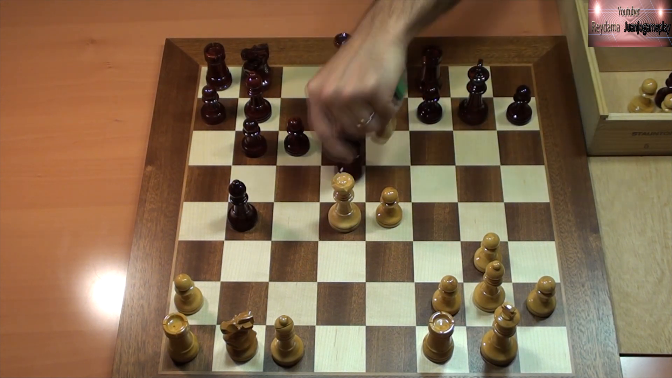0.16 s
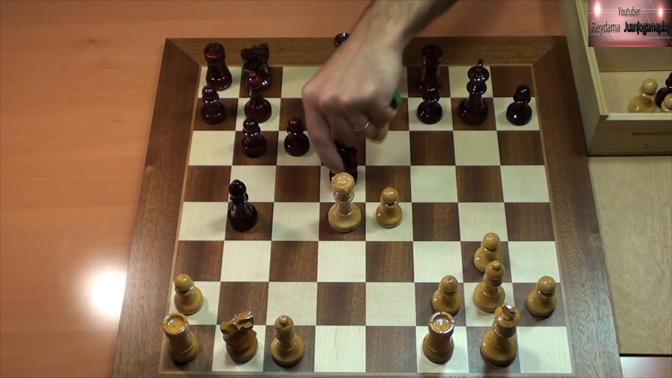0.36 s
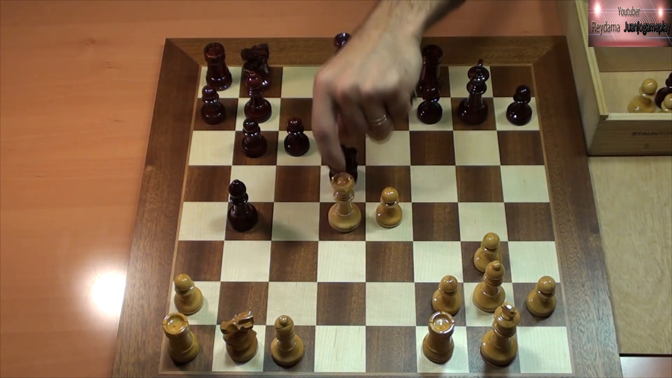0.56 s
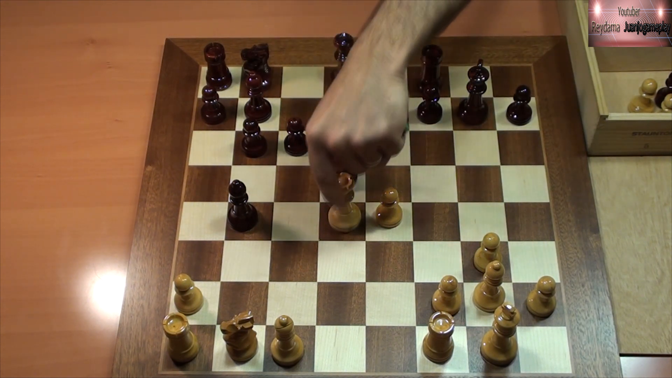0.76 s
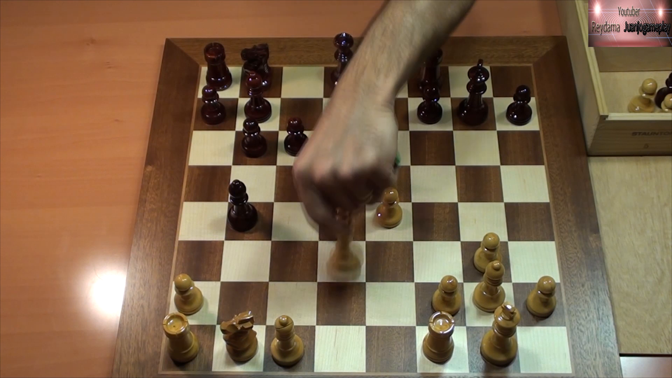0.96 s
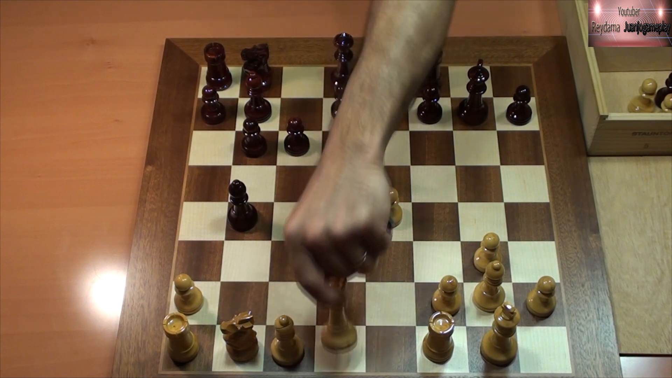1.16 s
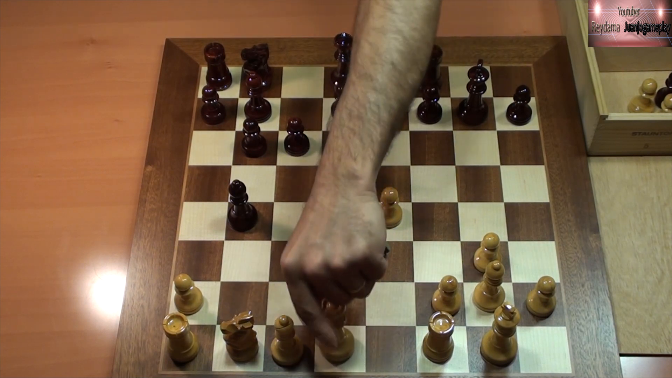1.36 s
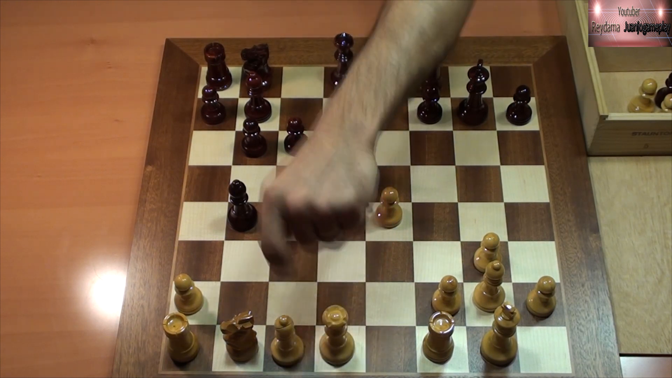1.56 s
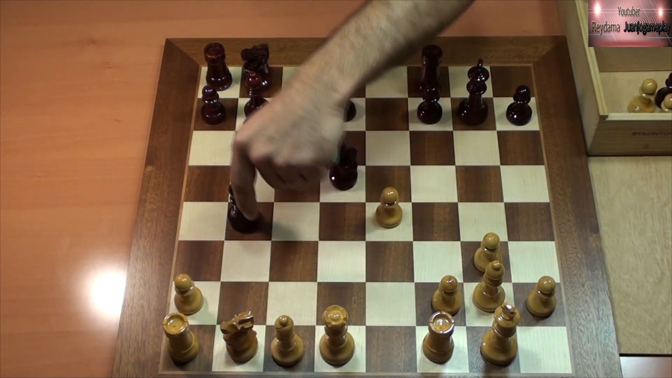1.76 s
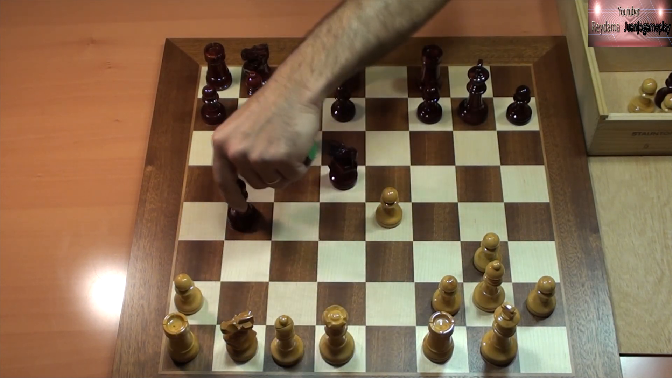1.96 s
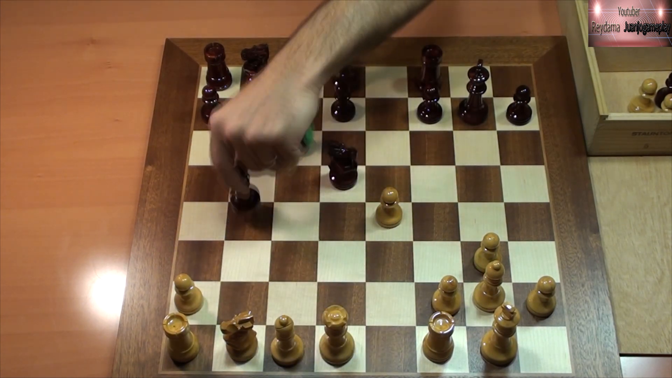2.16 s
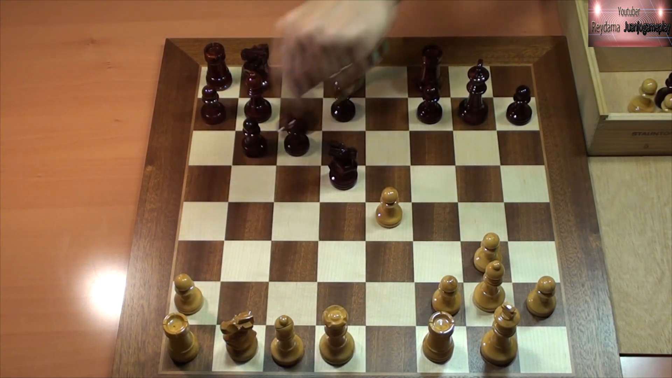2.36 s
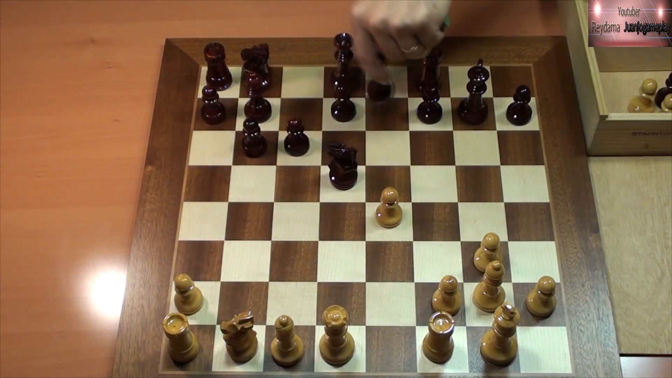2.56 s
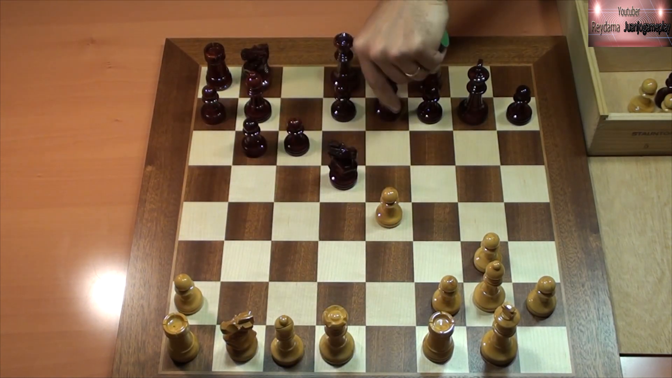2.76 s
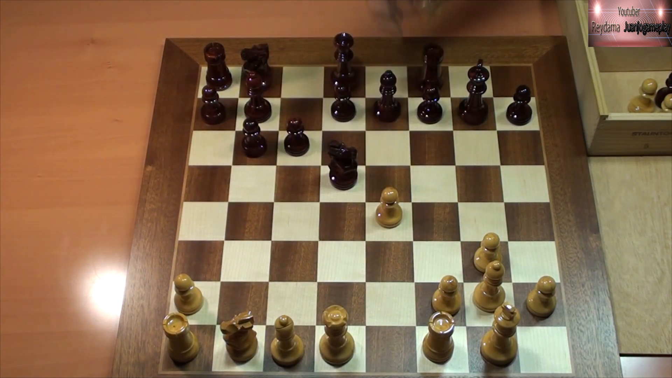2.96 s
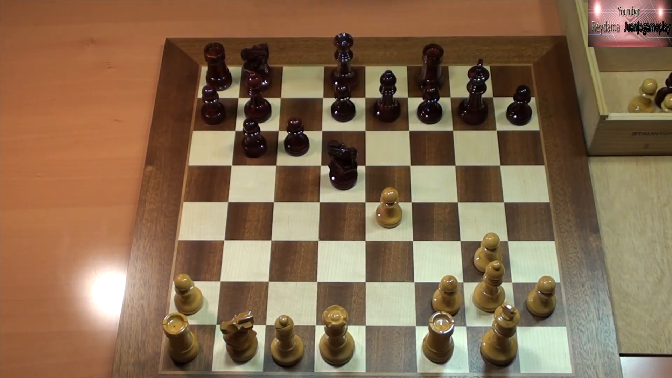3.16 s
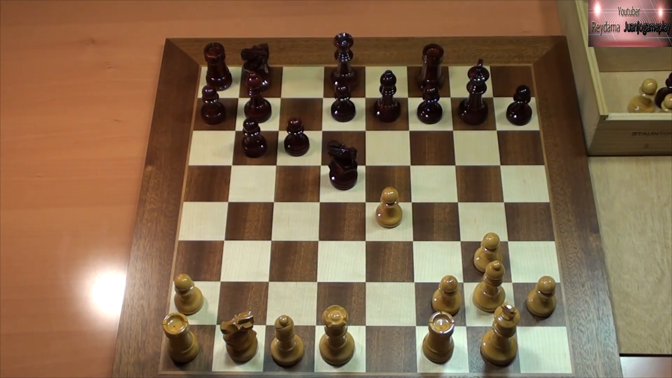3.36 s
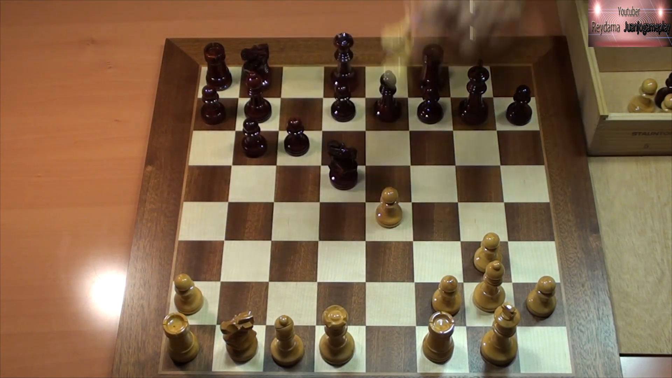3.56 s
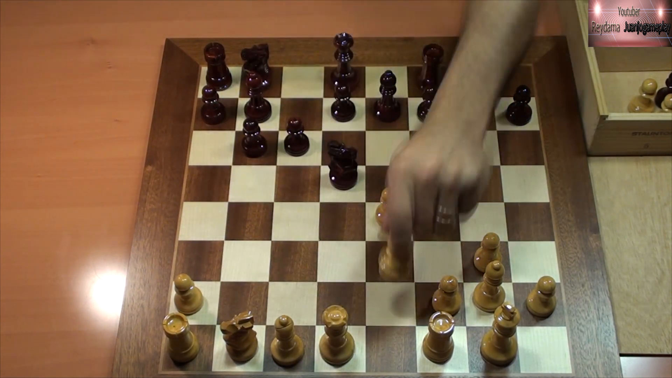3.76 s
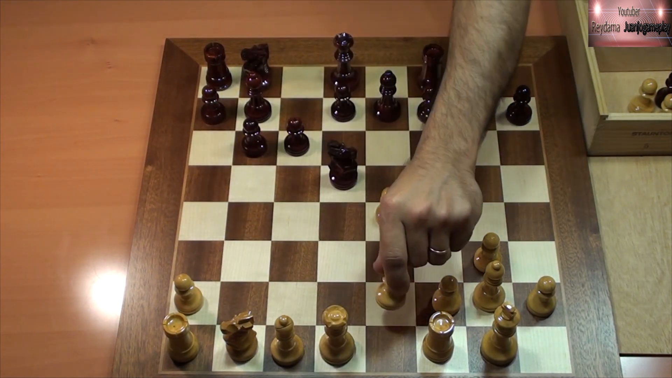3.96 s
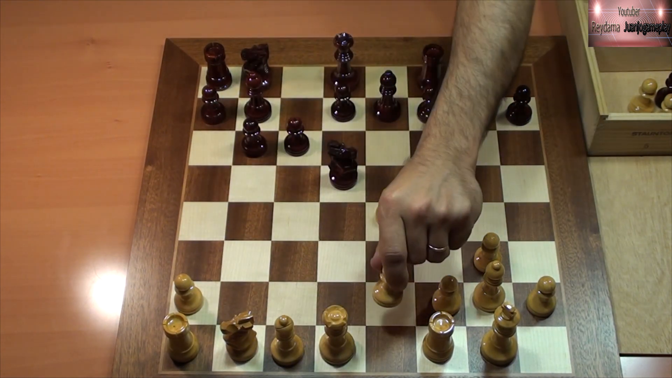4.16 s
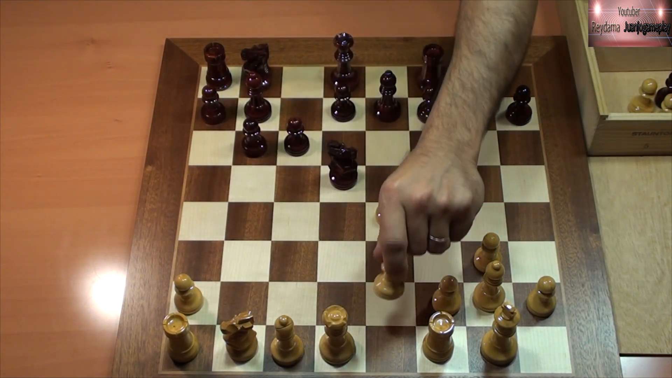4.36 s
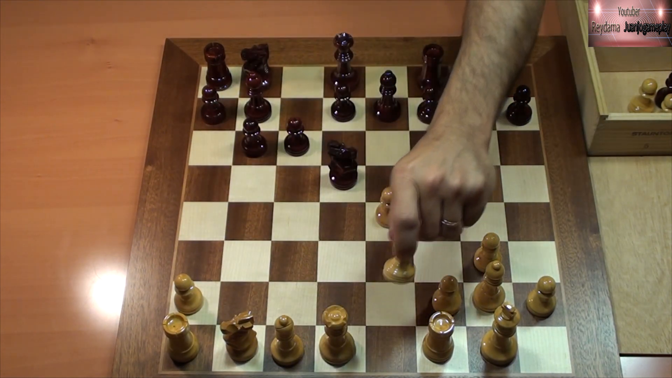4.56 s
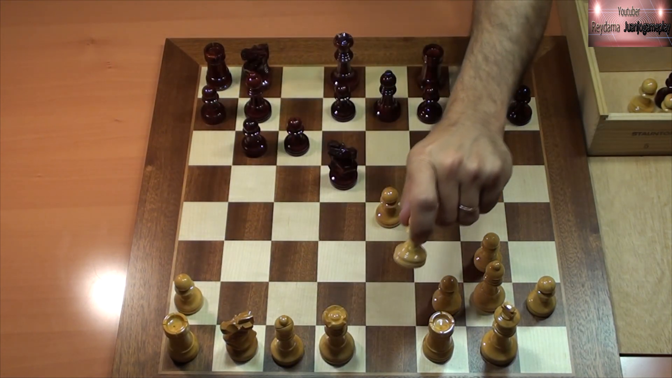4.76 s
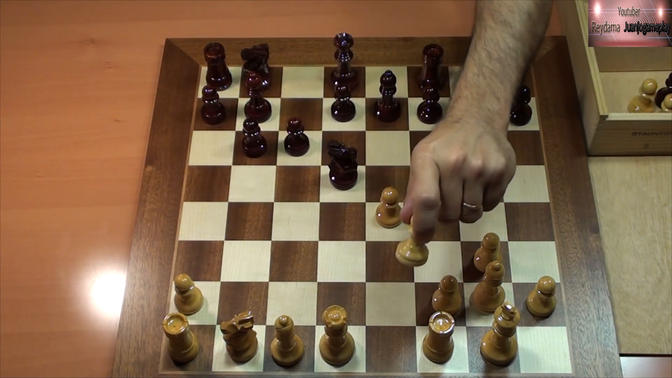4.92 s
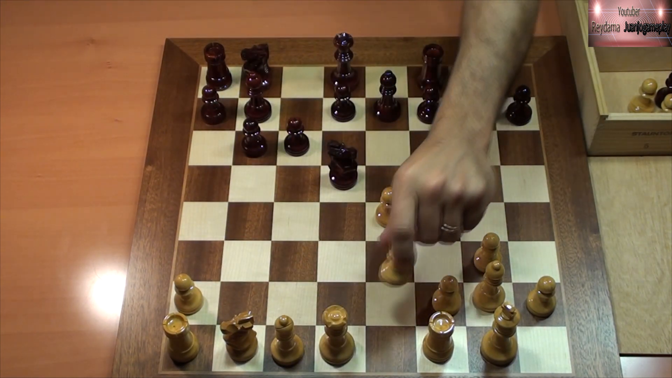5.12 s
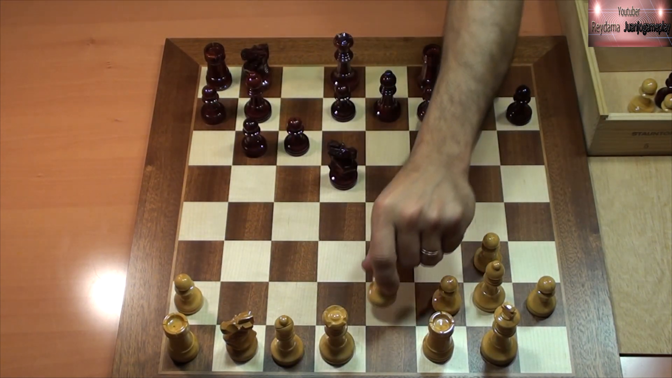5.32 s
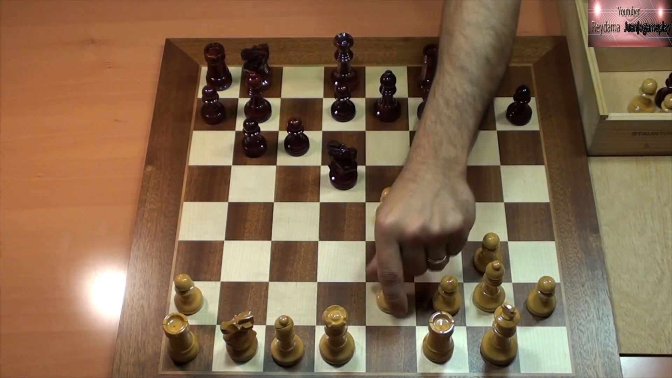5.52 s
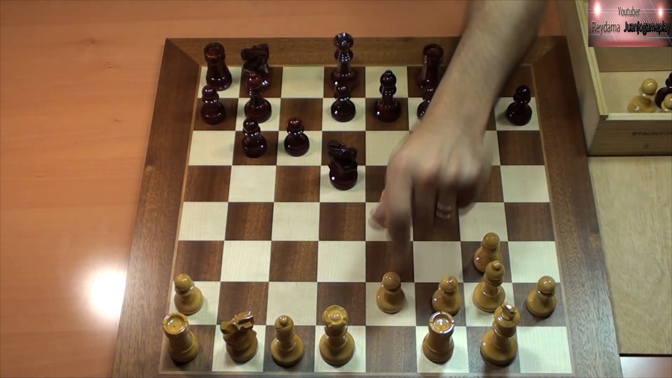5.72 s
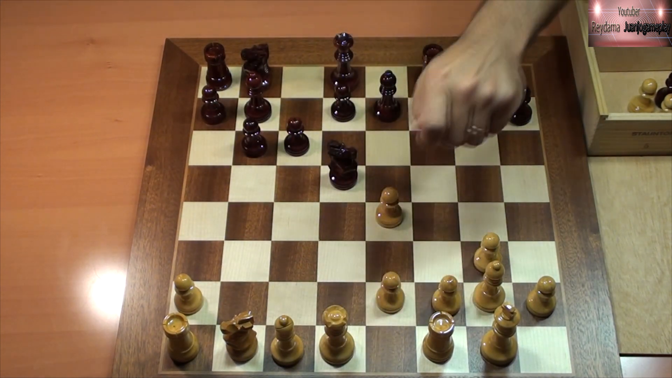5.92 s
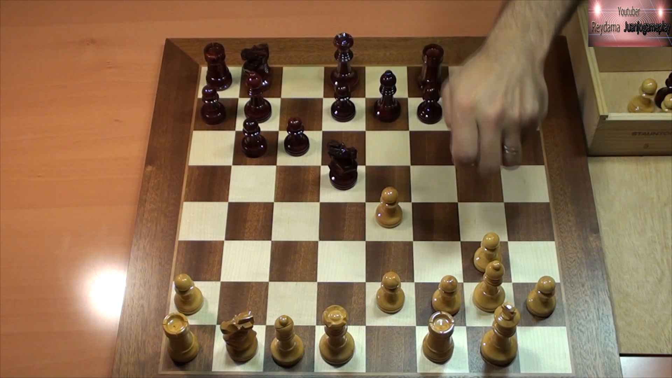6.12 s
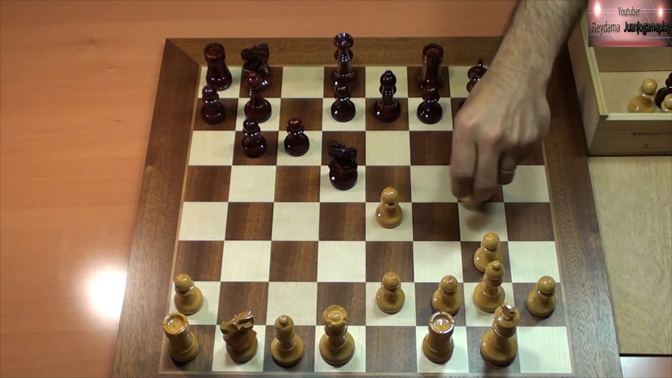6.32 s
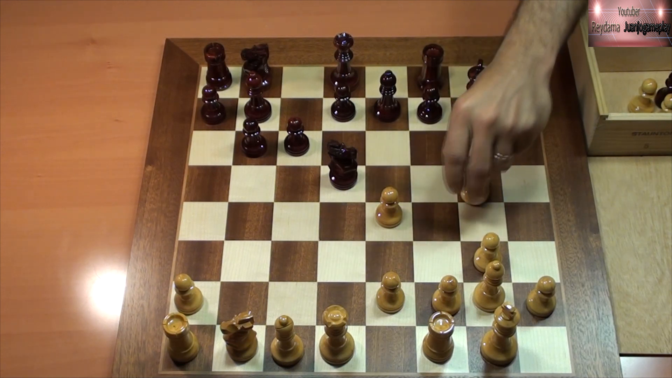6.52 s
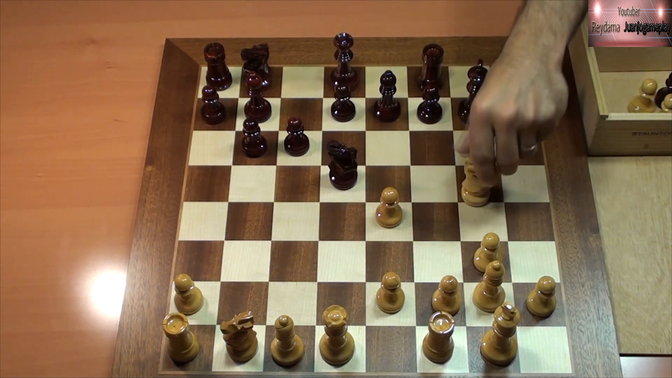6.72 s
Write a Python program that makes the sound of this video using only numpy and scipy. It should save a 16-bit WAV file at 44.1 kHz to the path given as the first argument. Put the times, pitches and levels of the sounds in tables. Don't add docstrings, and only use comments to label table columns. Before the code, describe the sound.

Sparse ticks and woody set-downs of chess pieces, then a hard cracking slam and a sharp clack, above quiet indoor hum.

```python
import sys
import numpy as np
from scipy import signal
from scipy.fft import rfft, irfft
from scipy.io import wavfile
from scipy.ndimage import uniform_filter1d, minimum_filter1d

SR = 44100
rng = np.random.default_rng(int(sys.argv[2]) if len(sys.argv) > 2 else 0)


def amplitude_ratio(level_db):
    exponent = np.asarray(level_db, float) / 20
    return 10 ** exponent


def generate_wav(signal):
    frames = np.transpose(np.atleast_2d(signal))
    scaled = np.clip(frames, -1, 1) * 32767
    pcm = np.round(scaled).astype(np.int16)
    wavfile.write(sys.argv[1], SR, pcm)


N = 303849
CUT_S = 3.323


def unit(x):
    return x / np.sqrt(np.mean(x ** 2))


def across(table, hz):
    rows = np.array(table)
    return np.interp(np.log(hz + 1), np.log(rows[:, 0]), rows[:, 1])


def colour(x, table):
    n = x.shape[-1]
    hz = np.arange(n // 2 + 1) * SR / n
    return irfft(rfft(x) * amplitude_ratio(across(table, hz)), n)


def pair(mid, side, width):
    side = colour(side, width)
    return np.array([mid + side, mid - side])


def walk(rate):
    k = int(SR / rate)
    steps = np.repeat(rng.standard_normal(N // k + 1), k)
    return 1.42 * uniform_filter1d(uniform_filter1d(steps, k), k)[:N]


def band(x, hz, width_hz):
    b, a = signal.iirpeak(hz, hz / width_hz, SR)
    return signal.lfilter(b, a, signal.lfilter(b, a, x))


def bell(middle, length):
    edge = .35
    inside = .5 - np.abs(np.arange(N) / SR - middle) / length
    return np.sin(np.pi / 2 * np.clip(inside / edge, 0, 1)) ** 2


# f/Hz, side minus mid level/dB
AIR_WIDTH = [(60, -23), (110, -15), (200, -13), (700, -4), (2380, -4.5), (4400, -7.5), (8120, -12),
             (15000, -20)]


def diffuse(spectrum):
    return unit(pair(*colour(rng.standard_normal((2, N)), spectrum), AIR_WIDTH))


# f/Hz, level per Hz/dB
HISS = [(15, -45.5), (25, -22), (43, -13), (107, -9), (240, -5), (297, -5), (340, -7), (433, -7),
        (741, -11), (871, -7.5), (1080, -12), (1450, -12.5), (3000, -17.5), (5580, -19.5), (15500, -22.5)]


def hiss():
    t = np.arange(N) / SR
    before_db, after_db, creep_db_per_s = 0.78, -0.74, 0.74
    gain_db = np.where(t < CUT_S, before_db, after_db + creep_db_per_s * (t - CUT_S))
    return diffuse(HISS) * amplitude_ratio(-55 + gain_db)


# f/Hz, level per Hz/dB
TRAFFIC = [(60, -29), (110, -3.5), (160, 0), (240, 2.5), (450, -0.5), (900, -6), (2000, -12), (5000, -24)]
# middle t/s, length t/s, depth level/dB
LULLS = [
    (0, 0.45, -2.5),
    (2.4, 0.83, -7.5),
    (3.32, 0.67, -9),
]


def traffic():
    lull_db = sum(db * bell(s, length) for s, length, db in LULLS)
    road = diffuse(TRAFFIC) * amplitude_ratio(lull_db)
    drone_hz, drone_width_hz, drone_db = 161, 13, -10
    drone = amplitude_ratio(drone_db) * unit(band(rng.standard_normal(N), drone_hz, drone_width_hz))
    level_db = -57 + 1.2 * walk(5.2)
    return (road + drone) * amplitude_ratio(level_db) * (np.arange(N) / SR < CUT_S)


# f/Hz, width f/Hz, rms level/dB
WHINES = [
    (120, 4, -73.5),
    (163.6, 6.5, -74),
    (3360, 150, -77.5),
    (5600, 200, -75.5),
]


def whines():
    return sum(unit(band(rng.standard_normal(N), hz, width_hz)) * amplitude_ratio(db) for hz, width_hz, db in WHINES)


def hum(swells, idle=0):
    sizes = np.array([bell(s, length) * amplitude_ratio(db) for s, length, _, db in swells])
    total = sizes.sum(axis=0)
    pitch = np.array(swells)[:, 2]
    hz = (pitch @ sizes + 1e-6 * pitch.mean()) / (total + 1e-6)
    hz = uniform_filter1d(hz, 4000)
    tone = np.sin(2 * np.pi * np.cumsum(hz + .5 * walk(5.36)) / SR)
    flutter_db = .8 * walk(5)
    return np.sqrt(2) * tone * (total + idle) * amplitude_ratio(flutter_db)


# middle t/s, length t/s, pitch f/Hz, rms level/dB
ENGINE = [
    (.49, 0.48, 80, -63),
    (1.05, 0.67, 78, -57.5),
    (1.4, 0.35, 77.3, -53.5),
    (1.85, 1.16, 77.4, -62.5),
    (2.7, 0.99, 78.6, -60),
    (3.27, .14, 80, -68),
]


def engine():
    return hum(ENGINE)


# middle t/s, length t/s, pitch f/Hz, rms level/dB
MOTOR = [
    (.4, 1.77, 294.3, -74),
    (2.6, .7, 294.8, -71),
    (3.9, 0.91, 295.3, -66),
    (5.65, 1.88, 295.6, -62),
]


def motor():
    idle_db, stops_s = -67.5, 7.1
    running = uniform_filter1d(1. * (np.arange(N) / SR < stops_s), 2000)
    return hum(MOTOR, amplitude_ratio(idle_db) * running)


# f/Hz, t/s
ROOM_T60 = [(100, 0.31), (250, 0.74), (500, 0.62), (1000, 0.52), (2000, 0.62), (4000, 0.62), (8000, 0.5),
            (14000, 0.18)]
# f/Hz, side minus mid level/dB
TAIL_WIDTH = [(125, -21), (500, -18), (1000, -19), (2000, -17), (4500, -11.5), (8000, -21), (14000, -39)]


def room_tail():
    first_wall_ms, build_cycles = 0.76, 1.34
    early_db, early_ms = 4, 12
    t = np.arange(2 ** 15) / SR
    late = np.clip(t - first_wall_ms / 1000, 0, None)
    octave = np.log2(np.arange(len(t) // 2 + 1) * SR / len(t) / 80 + 1e-9)
    noise = rfft(rng.standard_normal((2, len(t))))
    tail = 0
    for step in np.arange(0, 8, .5):
        hz = 80 * 2 ** step
        share = np.cos(np.pi * np.clip(octave - step, -.5, .5)) ** 2
        fade = np.exp(-np.log(1000) * t / max(across(ROOM_T60, hz), .05))
        build = 1 - np.exp(-late * hz / build_cycles)
        tail = tail + irfft(noise * share) * fade * build
    early = amplitude_ratio(early_db * np.exp(-t * 1000 / early_ms))
    return pair(*(tail * early), TAIL_WIDTH) / np.sqrt(SR) * 6


def add(out, s, sound):
    i = int(s * SR)
    out[:, i:i + sound.shape[1]] += sound[:, :N - i]


def add_echo(out, s, sound, room_db):
    add(out, s, amplitude_ratio(room_db) * signal.fftconvolve(sound[None], room_tail(), axes=1))


def knocks(modes, blows):
    out, t = np.zeros((2, N)), np.arange(4096) / SR
    ring = 0
    for k, (hz, width_hz, db) in enumerate(modes):
        swell = width_hz * width_hz * t * np.exp(-1.5 * np.pi * width_hz * t)
        ring = ring + (-1) ** k * amplitude_ratio(db) * swell * np.sin(2 * np.pi * hz * t)
    for s, peak_db, contact_ms, room_db, pan_db in blows:
        push = np.exp(-((t[:256] * 1000 - 2 * contact_ms) / (contact_ms / 2)) ** 2)
        blow = np.convolve(ring, push)
        blow = blow * amplitude_ratio(peak_db) / np.abs(blow).max()
        start = s - contact_ms / 1000
        add(out, start, blow * amplitude_ratio([[pan_db / 2], [-pan_db / 2]]))
        add_echo(out, start, blow, room_db)
    return out


# t/s, peak level/dB, contact t/ms, room share level/dB, left minus right level/dB
LIGHT_MODES = [(2180, 255, 4), (3350, 540, -20)]
LIGHT_BLOWS = [
    (.117, -37, 0.065, 0, -.7),
    (1.993, -40.5, 0.077, -3, -.7),
    (3.087, -42, .08, -2, -.2),
]


def light_head():
    return knocks(LIGHT_MODES, LIGHT_BLOWS)


# start t/s, length t/s, centre f/Hz, width f/Hz, rms level/dB
SLIDES = [
    (0.148, .15, 7500, 1800, -57),
    (2.53, 0.048, 750, 800, -54),
    (2.535, .12, 395, 447, -48),
    (3.721, 0.11, 450, 500, -61),
]


def slides():
    out, n = np.zeros((2, N)), SR // 2
    for s, length, hz, width_hz, db in SLIDES:
        noise = rng.standard_normal(n) * amplitude_ratio(2.0 * rng.exponential(size=n))
        swell = np.sin(np.pi * np.clip(np.arange(n) / SR / length, 0, 1))
        rub = unit(band(noise, hz, width_hz)) * swell * amplitude_ratio(db)
        add(out, s, np.array([rub, rub]))
        add_echo(out, s, rub, -9)
    return out


NEAR_MODES = [(243, 44, -1), (383, 49, -4), (503, 71, -2.5), (737, 113, 3.5), (932, 81, 2.5),
              (1137, 160, -0.5), (1420, 230, -7), (1800, 480, -14)]
NEAR_BLOWS = [
    (1.319, -23, .35, 6, -1),
    (1.3315, -28, .45, 2, -1),
]


def near_edge():
    return knocks(NEAR_MODES, NEAR_BLOWS)


BOARD_MODES = [(375.8, 18, 2), (500, 27, -4.5), (624, 18, 5), (987, 14, -5), (1378, 23, 6.5)]
BOARD_BLOWS = [
    (1.3204, -33, 0.68, -17, -1),
    (2.785, -30, 0.62, -3.5, -0.86),
    (5.491, -15.5, 0.15, -19, -.4),
]


def hollow_board():
    return knocks(BOARD_MODES, BOARD_BLOWS)


FAR_MODES = [(223, 75, -16.5), (391, 47, -6), (520, 120, -22.5), (670, 120, -6), (942, 158, -0.5),
             (1330, 330, -3.5), (1860, 390, -23), (2200, 500, -22)]
FAR_BLOWS = [
    (2.7852, -9, 0.32, -4, -.7),
]


def far_edge():
    return knocks(FAR_MODES, FAR_BLOWS)


DARK_MODES = [(2037, 180, 1.5), (2700, 600, -18.5), (3440, 800, -18), (4200, 740, -27.5), (5640, 900, -30),
              (6840, 710, -21.5), (9000, 2000, -35)]
DARK_BLOWS = [
    (2.809, -25.5, .04, 0, -.8),
]


def dark_head():
    return knocks(DARK_MODES, DARK_BLOWS)


HARD_MODES = [(237, 62, -23), (377, 56, -13), (508, 90, -33.5), (667, 85, -3), (770, 113, -13),
              (973, 95, 4), (1153, 195, -8.5), (1359, 102, 6), (1680, 325, -3.5), (2115, 320, -4),
              (2720, 390, -6.5), (3210, 480, -14), (3710, 420, -17.5), (4260, 520, -27.5), (5620, 940, -28),
              (7480, 460, -21), (9500, 2000, -54.5)]
HARD_BLOWS = [
    (5.4907, -7, 0.11, 12.33, -0.44),
]


def hard_base():
    return knocks(HARD_MODES, HARD_BLOWS)


RIM_MODES = [(45, 36, -24.5), (2320, 440, 4.5), (3240, 810, -24), (7500, 1100, -31.5), (9500, 2200, -37.5)]
RIM_BLOWS = [
    (5.4942, -3.5, .06, 0, -.4),
    (5.5075, -5, .06, -7, -.4),
]


def rim():
    return knocks(RIM_MODES, RIM_BLOWS)


CROWN_MODES = [(8030, 1300, 0)]
CROWN_BLOWS = [
    (5.761, -38.5, 0.037, -3, 0),
]


def crown():
    return knocks(CROWN_MODES, CROWN_BLOWS)


COLLAR_MODES = [(7200, 900, 0)]
COLLAR_BLOWS = [
    (5.7795, -46, .03, -12, 0),
    (5.782, -42, 0.024, -12, 0),
]


def collar():
    return knocks(COLLAR_MODES, COLLAR_BLOWS)


PAWN_MODES = [(1560, 340, -9), (1990, 170, -1), (2300, 126, 4.5), (2570, 170, -6.5), (2880, 140, -3),
              (3360, 220, -3.5), (3520, 400, -17), (3950, 550, -13.5), (4630, 800, -29),
              (5760, 1300, -19.5), (7300, 300, -4.5), (8330, 480, -18)]
PAWN_BLOWS = [
    (6.008, -13.5, 0.037, -2, -0.64),
    (6.069, -24.5, 0.14, -2, -0.49),
    (6.11, -28, 0.105, -16, -.5),
]


def pawn_head():
    return knocks(PAWN_MODES, PAWN_BLOWS)


RIGHT_MODES = [(227, 76, -3), (340, 98, -3), (520, 94, -1), (737, 155, 0), (980, 280, -11),
               (1370, 400, -15)]
RIGHT_BLOWS = [
    (6.513, -28.5, 0.41, 2.7, -.9),
]


def right_side():
    return knocks(RIGHT_MODES, RIGHT_BLOWS)


def scene():
    background = hiss() + traffic() + whines() + engine() + motor()
    opening = light_head() + slides() + near_edge() + hollow_board() + far_edge() + dark_head()
    slam = hard_base() + rim()
    clicks = crown() + collar() + pawn_head()
    return background + opening + slam + clicks + right_side()


def limit(x):
    ceiling, look_ahead = .95, 200
    room_left = ceiling / np.maximum(np.abs(x).max(axis=0), ceiling)
    return x * uniform_filter1d(minimum_filter1d(room_left, 2 * look_ahead), look_ahead)


def top_cut(x):
    return signal.sosfilt(signal.butter(12, 16860, fs=SR, output="sos"), x)


# f/Hz, left minus right level/dB
PORT_TILT = [(60, -.8), (380, -1), (1290, -0.5), (15000, 0.3)]


def record(dry):
    left = [(hz, db / 2) for hz, db in PORT_TILT]
    right = [(hz, -db / 2) for hz, db in PORT_TILT]
    x = np.array([colour(dry[0], left), colour(dry[1], right)])
    dip_ms, dip_db = 4.1, -12
    from_cut_ms = (np.arange(N) / SR - CUT_S) * 1000
    x = x * amplitude_ratio(dip_db * np.exp(-(from_cut_ms / dip_ms) ** 2))
    top_hz = 15850
    x = signal.sosfilt(signal.ellip(10, .1, 80, top_hz, fs=SR, output="sos"), x)
    mix = limit(x)
    return top_cut(mix)


dry = scene()
out = record(dry)
generate_wav(out)
```